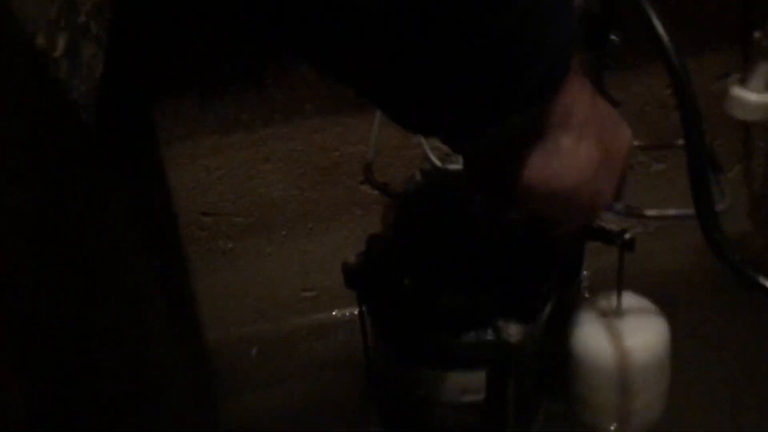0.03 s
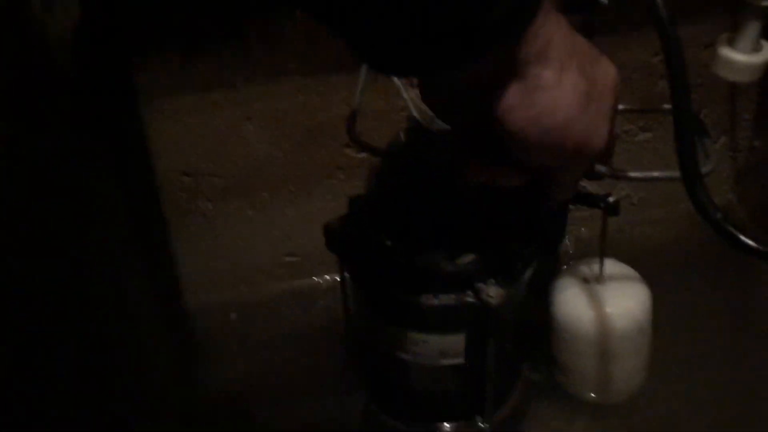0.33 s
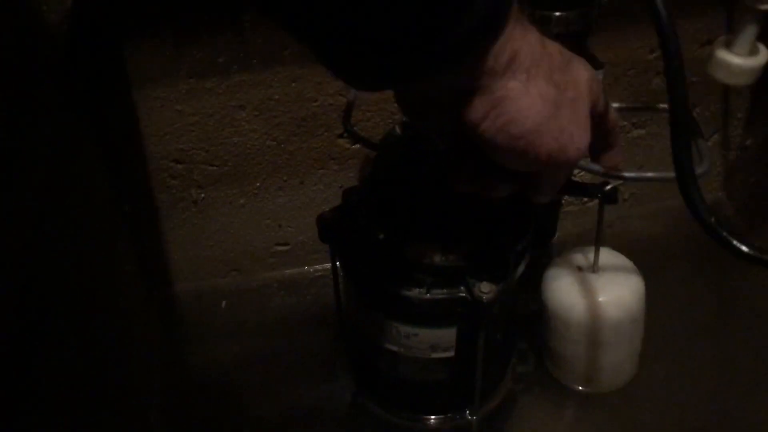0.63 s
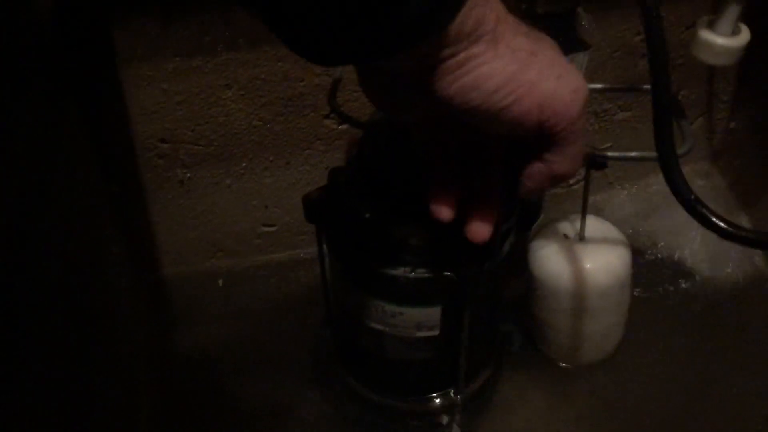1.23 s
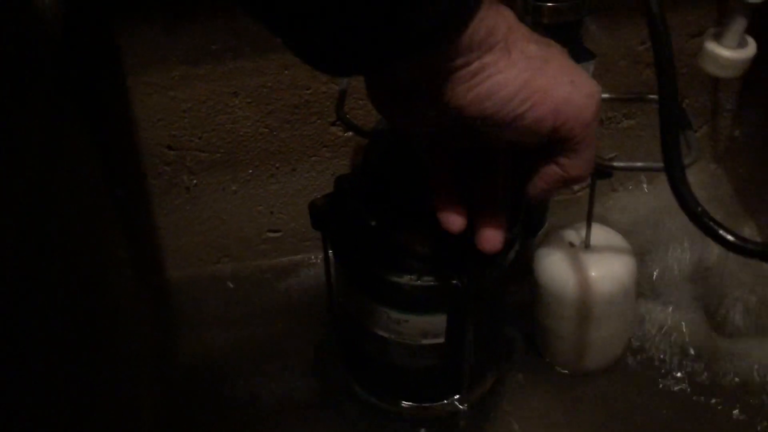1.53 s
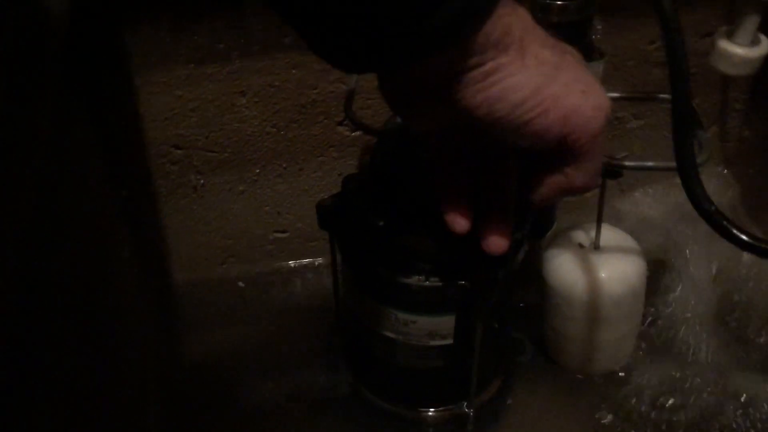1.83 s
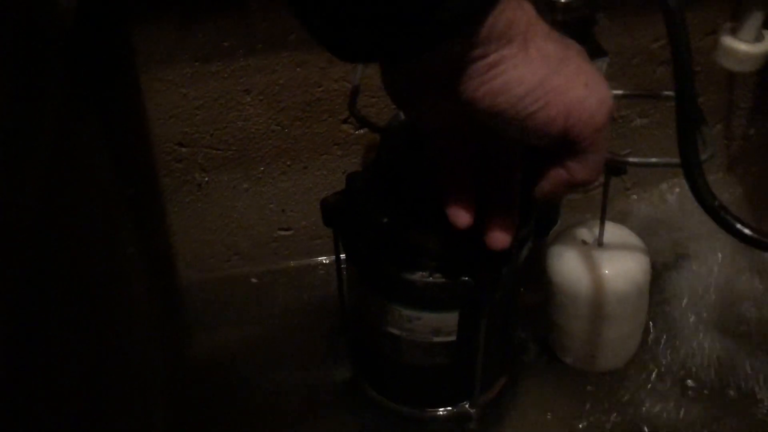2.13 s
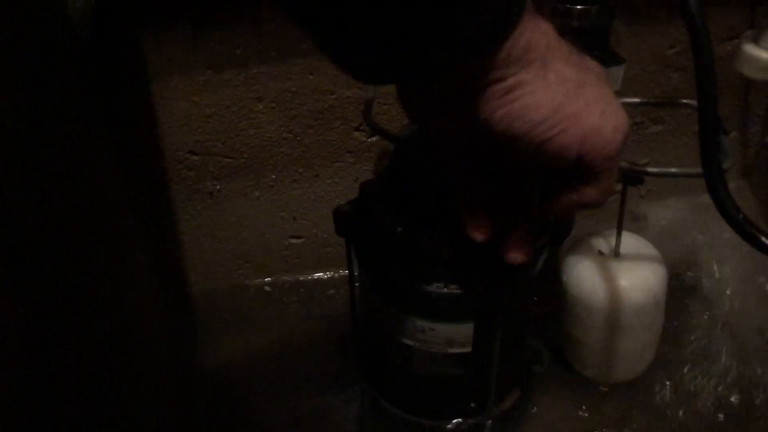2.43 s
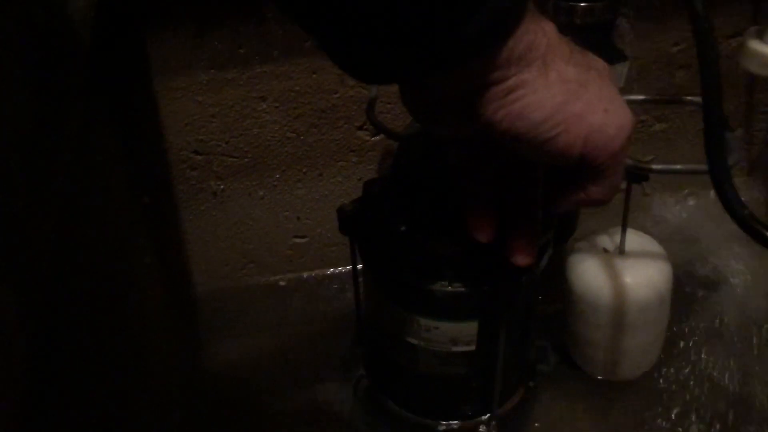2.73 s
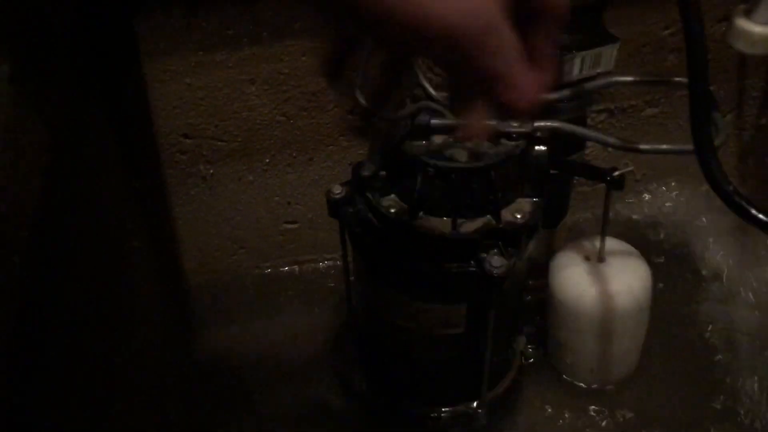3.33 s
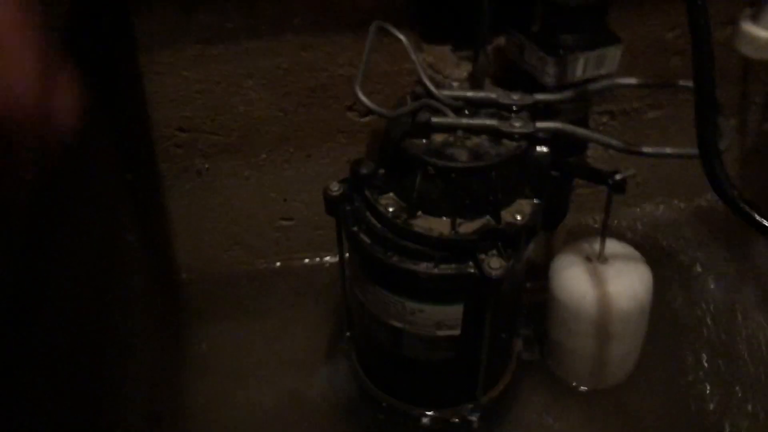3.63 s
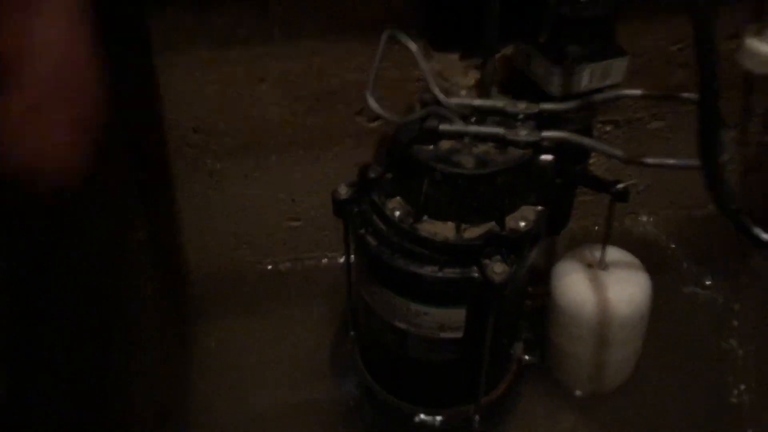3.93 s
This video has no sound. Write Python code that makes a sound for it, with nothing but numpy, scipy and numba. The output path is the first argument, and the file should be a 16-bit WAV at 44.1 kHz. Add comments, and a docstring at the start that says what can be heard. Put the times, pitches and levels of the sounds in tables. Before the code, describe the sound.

A sump pump sprays water in a concrete pit, heard from just above. A switch clacks, air spits out, then a hissing jet churns the water. The spray dies away and water gurgles and drips back.

```python
"""Sump pump in a concrete pit.

Heard from just above. The float rod ticks, the switch clacks on and the submerged motor kicks.
The pump spits out air, then a jet sprays (droplet impacts) and churns the water (ringing bubbles).
When it stops, the jet dies away and water gurgles back down the pipe into the pit."""
import sys
import numpy as np
from scipy import signal
from scipy.fft import rfft, irfft
from scipy.io import wavfile
from scipy.ndimage import uniform_filter1d
from numba import njit

SR = 44100
rng = np.random.default_rng(int(sys.argv[2]) if len(sys.argv) > 2 else 0)


def waveform_to_disk(signal):
    """Save audio, clipped to [-1, 1], as 16-bit WAV at the path in sys.argv[1]."""
    frames = np.transpose(np.atleast_2d(signal))
    scaled = np.clip(frames, -1, 1) * 32767
    samples = np.round(scaled).astype(np.int16)
    wavfile.write(sys.argv[1], SR, samples)


N = 176400

# Pit resonances and hollows. Each row: centre in Hz, width in Hz, boost in dB.
PIT_MODES = [(95, 35, 8.5), (121.3, 22.2, -16), (153, 39, 7.5), (292, 40, -4.5), (363, 30, 5.5),
             (460.3, 41, 9.5), (493, 21, -10), (554, 20, 4), (866, 95, 4.5), (956, 42, -21.5),
             (1014, 26, 8), (1150, 31, 10), (1355, 23, 5.5), (1455, 32, 9), (1807, 43, 12)]
# Splash spectrum. Each row: frequency in Hz, gain in dB.
SPLASH_SPECTRUM = [(800, -9.5), (2500, 0.5), (3800, -3.5), (5000, 1), (5900, -0.5), (7300, 2.5), (8800, -1),
                   (11300, 0.5), (13500, -6), (16000, -10)]
BUBBLE_CYCLES, BUBBLE_RISE = 8, 0.076  # mean cycles to die away; fractional pitch rise meanwhile


def undb(db):
    """Decibels to gain."""
    return 10 ** (np.asarray(db) / 20)


def unit(x):
    """Scale to rms 1."""
    return x / np.sqrt(np.mean(x ** 2))


def noise():
    """White noise."""
    return rng.standard_normal(N)


def curve(rows):
    """Gain along (s, dB) points, silent before the first."""
    return undb(np.interp(np.arange(N) / SR, *np.array(rows).T, left=-120))


def flutter(rate_hz, depth_db):
    """Smooth random gain; depth is rms."""
    width = int(SR / rate_hz)
    return undb(depth_db * unit(uniform_filter1d(uniform_filter1d(noise(), width), width)))


def burst(start_s, db, attack_s, t60_s):
    """Envelope: linear rise, exponential decay."""
    age_s = np.arange(N) / SR - start_s
    decay = np.exp(-np.log(1000) * np.maximum(age_s - attack_s, 0) / t60_s)
    return undb(db) * np.clip(age_s / attack_s, 0, 1) * decay


def highpass(x, hz):
    """Second-order low cut."""
    return signal.sosfilt(signal.butter(2, hz, "high", fs=SR, output="sos"), x)


def colour(x, spectrum, modes=()):
    """Filter by (Hz, dB) points plus (Hz, width Hz, dB) resonances; output rms 1."""
    size = 16384
    bin_hz = np.arange(size // 2 + 1) * SR / size
    hz, db = np.array(spectrum).T
    shape_db = np.interp(np.log(bin_hz + 1), np.log(hz), db)
    for centre_hz, width_hz, boost_db in modes:
        shape_db += boost_db / (1 + (2 * (bin_hz - centre_hz) / width_hz) ** 2)
    cepstrum = irfft(np.log(undb(shape_db)))
    cepstrum[1:size // 2] *= 2  # fold to minimum phase
    cepstrum[size // 2 + 1:] = 0
    impulse = irfft(np.exp(rfft(cepstrum)))[:size // 2]
    return unit(signal.fftconvolve(x, impulse)[:N])


@njit
def ring(rows, rise):
    """Bubbles ring as fading sines that rise in pitch."""
    out = np.zeros(N)
    for start_s, hz, gain, t60_s in rows:
        first, phase = int(start_s * SR), 0.
        for i in range(min(int(t60_s * SR), N - first)):
            age = i / (t60_s * SR)
            phase += 2 * np.pi * hz * (1 + rise * age) / SR
            out[first + i] += gain * np.exp(-6.9 * age) * (1 - np.exp(-phase / 2)) * np.sin(phase)
    return out


def bubbles(per_s, low_hz, high_hz, spread_db):
    """Cloud of random bubbles; high ones are shorter and sharper."""
    when, pitch, weakness, life = rng.random((int(per_s * N / SR), 4)).T
    hz = low_hz * (high_hz / low_hz) ** pitch
    gain = hz * undb(-spread_db * np.sqrt(weakness))
    t60_s = BUBBLE_CYCLES * (.5 + life) / hz
    return unit(ring(np.column_stack([when * N / SR, hz, gain, t60_s]), BUBBLE_RISE))


def drops(per_s, spread_db):
    """Random droplet impacts of uneven strength."""
    impacts = (rng.random(N) < per_s / SR) * np.sign(noise())
    return impacts * undb(spread_db * np.clip(noise(), -1.5, 1.5))


def jet():
    """Air pops and spits out, mist swells until the air is gone, spray runs on and ends in loose drops."""
    # Spectra. Each row: frequency in Hz, gain in dB.
    pop_spectrum = [(40, -17), (100, -3), (300, -11), (700, 6), (1700, 0), (2600, -6.5), (6000, -35),
                    (16000, -23)]
    spit_spectrum = [(1000, -25), (2800, -25), (4000, -1.5), (6000, 2.5), (9500, 9), (12500, 2),
                     (16000, -6)]
    mist_spectrum = [(2500, -31), (4500, 0), (7500, -8), (11800, 4.5), (16000, -9)]
    spray_spectrum = [(500, -14.5), (1800, -8.5), (2500, -8), (4000, -7), (5700, 1.5), (7800, 0.5),
                      (8900, -3), (12000, -3.5), (13500, -8.5), (16000, -12.5)]
    # Resonances. Each row: centre in Hz, width in Hz, boost in dB.
    pop_modes = [(882, 73, 9), (1660, 80, 6)]
    spray_modes = [(1770, 160, 4), (1940, 200, -4), (2485, 215, 11), (2760, 200, 7), (3426, 220, 8.5),
                   (7270, 340, 3.5)]
    # Hiss as the pump runs up and down. Each row: time in seconds, level in dB.
    spray_levels = [(.68, -75), (.735, -63), (.775, -37), (.83, -27), (.86, -33), (.93, -26), (1.02, -22.5),
                    (1.07, -24), (2.0, -25), (2.9, -23.5), (3.19, -24), (3.28, -32), (3.36, -42),
                    (3.5, -84)]
    pop = colour(noise(), pop_spectrum, PIT_MODES + pop_modes)
    pop *= burst(start_s=.8075, db=-15.5, attack_s=.0073, t60_s=.082)
    spit = colour(noise(), spit_spectrum) * burst(start_s=.807, db=-13, attack_s=.013, t60_s=.047)
    mist = colour(noise(), mist_spectrum) * burst(start_s=.855, db=-22.5, attack_s=.17, t60_s=.063)
    spray = colour(drops(per_s=9000, spread_db=2.8), spray_spectrum, spray_modes)
    last_drops = colour(bubbles(per_s=1200, low_hz=1010, high_hz=12100, spread_db=25), SPLASH_SPECTRUM)
    last_drops *= burst(start_s=3.195, db=-32, attack_s=.051, t60_s=.52)
    spray *= curve(spray_levels) * flutter(rate_hz=78, depth_db=1.1)
    return pop + spit + mist + spray + last_drops


def churn():
    """The jet splashes and drives air under water; splashes and bubbles sound the pit."""
    # Stirred water. Each row: time in seconds, level in dB.
    levels = [(.68, -59), (.705, -50), (.75, -45.5), (.79, -29), (.83, -40), (.865, -43.5), (.93, -30),
              (1.2, -30.5), (1.9, -30), (2.6, -31), (3.2, -32), (3.26, -35.5), (3.34, -44), (3.5, -40.5)]
    # Its spectrum. Each row: frequency in Hz, gain in dB.
    spectrum = [(30, -59), (65, -23.5), (105, 1.5), (150, 7), (280, 5), (500, 5.5), (820, 2), (1250, -3.5),
                (2000, -4.5), (3500, -16.5)]
    cloud = colour(bubbles(per_s=2500, low_hz=69.9, high_hz=2724, spread_db=8.5), spectrum, PIT_MODES)
    splash = colour(drops(per_s=2500, spread_db=2.5), spectrum, PIT_MODES)
    return unit(cloud + undb(-4.5) * splash) * curve(levels) * flutter(rate_hz=23, depth_db=.7)


def backflow():
    """The pipe drains in gurgles and dull slaps, with light patter and drips."""
    # Returning water. Each row: time in seconds, level in dB.
    levels = [(3.33, -73), (3.38, -39), (3.42, -30.5), (3.47, -29.5), (3.53, -28), (3.7, -28), (3.86, -31),
              (3.92, -29), (4, -33.5)]
    # Gurgle and slap spectrum. Each row: frequency in Hz, gain in dB.
    spectrum = [(30, -44), (80, 0), (200, 2), (400, 4.5), (900, 0), (1350, -4.5), (1800, -10.5),
                (2400, -13.5), (4000, -19), (9000, -24)]
    # Patter resonances. Each row: centre in Hz, width in Hz, boost in dB.
    patter_modes = [(2720, 140, 3.5), (3230, 130, 7.1), (5800, 300, 6)]
    gurgle = colour(bubbles(per_s=1500, low_hz=71.3, high_hz=2460, spread_db=15), spectrum, PIT_MODES)
    slaps = colour(drops(per_s=600, spread_db=6.5), spectrum, PIT_MODES)
    patter = colour(drops(per_s=1700, spread_db=1), SPLASH_SPECTRUM, patter_modes)
    water = unit(gurgle + undb(.5) * slaps) + undb(-7) * patter + undb(-14.5) * drips()
    return water * curve(levels) * flutter(rate_hz=69, depth_db=1.2)


def glugs_and_splashes():
    """Single bubbles, sharp splashes and wet splats stand out of the rush."""
    # Deep glugs to bright plinks. Each row: start in seconds, pitch in Hz, level in dB, t60 in seconds.
    glugs = [(0.7353, 407, -20.5, 0.02), (0.821, 99, -28.5, .16), (.899, 360, -12.5, 0.062),
             (0.934, 186, -22, 0.069), (1.224, 161, -18.5, 0.12), (1.395, 465, -20, 0.12),
             (1.429, 170, -20.5, .08), (1.521, 185, -22, 0.065), (1.6337, 2690, -17, 0.026),
             (1.637, 2400, -14.5, 0.029), (1.761, 159, -17, 0.11), (2.062, 2550, -18, .04),
             (2.128, 450, -19.5, 0.14), (2.159, 181, -17, 0.065), (2.751, 2590, -15, .028),
             (2.794, 510, -16.5, 0.033), (3.395, 230, -21, 0.13), (3.437, 460, -9.5, 0.014),
             (3.493, 527, -18.5, 0.014), (3.767, 455, -11, 0.021), (3.785, 1340, -21.5, 0.11),
             (3.786, 1783, -18, 0.072), (3.836, 624, -16.5, 0.023), (3.954, 460, -22, 0.088)]
    # Each row: start in seconds, level in dB.
    splashes = [(1.778, -18.5), (3.429, -22), (3.493, -26), (3.765, -23.5)]
    # Each row: start in seconds, centre in Hz, level in dB, t60 in seconds.
    splats = [(.7335, 760, -38, .035), (.898, 850, -22, 0.061), (.932, 620, -27, .1),
              (.954, 1310, -31.5, 0.14), (1.92, 440, -29.5, 0.32), (2.233, 1500, -27.5, 0.043),
              (2.881, 9400, -17, 0.033), (3.188, 1120, -24.5, 0.062), (3.392, 8300, -25.5, 0.02),
              (3.405, 1080, -23, 0.022), (3.428, 1190, -22.5, 0.055), (3.713, 800, -26, 0.018),
              (3.732, 6200, -24.5, .025), (3.918, 1320, -27.5, 0.087)]
    water = colour(noise(), SPLASH_SPECTRUM)
    water *= sum(burst(start_s, db, attack_s=.0018, t60_s=.039) for start_s, db in splashes)
    for start_s, hz, db, t60_s in glugs:
        glug = ring(np.array([(start_s, hz, undb(db), t60_s)]), BUBBLE_RISE)
        water += highpass(glug, .61 * hz)
    return water + sum(splat(*row) for row in splats)


def splat(start_s, hz, db, t60_s):
    """Brief cluster of like-sized bubbles, as a band of noise."""
    edges_hz = hz * np.exp([-.25, .25])
    band = signal.sosfilt(signal.butter(2, edges_hz, "band", fs=SR, output="sos"), noise())
    return unit(band) * burst(start_s, db, attack_s=.0016, t60_s=t60_s)


def drips(per_s=350, t60_s=.03):
    """Tiny bubbles tinkle where single drops land."""
    when, pitch, weakness = rng.random((int(per_s * N / SR), 3)).T
    hz = 3200 + 8800 * pitch
    rows = np.column_stack([when * N / SR, hz, undb(-14 * weakness), np.full(len(when), t60_s)])
    return unit(ring(rows, rise=.02))


def float_switch(tick_s=.191, tick_hz=4800, snap_s=.6795):
    """The rod ticks and scrapes, then the switch snaps over."""
    # Rod knock and scrape. Each row: start in seconds, level in dB, attack in seconds, t60 in seconds.
    rod_contacts = [(.592, -50.5, 0.0022, 0.095), (.637, -53.5, 0.014, 0.76)]
    # Spectra. Each row: frequency in Hz, gain in dB.
    rod_spectrum = [(180, -35), (330, -11), (1850, -1), (2800, -4), (9800, -19), (15000, -36)]
    switch_spectrum = [(59, -43), (100, -24), (1000, -13.5), (1160, -5), (1430, -11), (2000, -9),
                       (3180, -16), (6350, -6), (7510, -13.5), (15000, -13)]
    # Switch resonances. Each row: centre in Hz, width in Hz, boost in dB.
    switch_modes = [(2020, 70, 6.3), (2850, 83, 7.8), (6430, 490, 8.9)]
    tick = colour(noise(), [(1000, -70), (tick_hz, -25), (8000, -45)], [(tick_hz, 500, 22)])
    tick *= burst(tick_s, db=-48.5, attack_s=.002, t60_s=.058)
    crack = colour(noise(), [(1500, -26), (5000, 7), (14000, -17)])
    crack *= burst(tick_s, db=-52.5, attack_s=.00087, t60_s=.04)
    rod = colour(noise(), rod_spectrum) * sum(burst(*row) for row in rod_contacts)
    snap = burst(snap_s, db=-22, attack_s=.004, t60_s=.052)
    tail = burst(snap_s, db=-48, attack_s=.0044, t60_s=.15)
    return tick + crack + rod + colour(noise(), switch_spectrum, switch_modes) * (snap + tail)


def motor_start(start_s=.697, hum_hz=118):
    """The housing jolts and hums briefly as the rotor gets going."""
    hum = np.sin(2 * np.pi * hum_hz * np.arange(N) / SR)
    hum *= burst(start_s, db=-43.5, attack_s=.011, t60_s=.2)
    jolt = colour(noise(), [(60, -20), (400, -5), (2000, -28)], PIT_MODES)
    jolt *= burst(start_s, db=-39.5, attack_s=.0032, t60_s=.09)
    return hum + jolt


def walls(x, wet_db=-14):
    """Add dense, short treble reflections from the pit walls."""
    echoes = highpass(noise() * burst(start_s=.00097, db=0, attack_s=.0034, t60_s=.074), hz=2040)
    return x + undb(wet_db) * signal.fftconvolve(x, echoes / np.linalg.norm(echoes))[:N]


def cellar(level_db=-66):
    """Faint, steady, bass-heavy room noise."""
    # Each row: frequency in Hz, gain in dB.
    spectrum = [(25, -18), (75, -1), (220, -10.5), (537, -17), (2230, -26.5), (7700, -28.5), (15500, -33)]
    return undb(level_db) * colour(noise(), spectrum)


def scene():
    """Pump and water in the pit, over the quiet cellar; both channels alike."""
    pit = float_switch() + motor_start() + jet() + churn() + backflow() + glugs_and_splashes()
    mono = walls(pit) + cellar()
    return np.array([mono, mono])


def record(dry):
    """Cut the deep bass and the top."""
    low_hz, top_hz = 50, 15800
    return signal.sosfilt(signal.ellip(10, .2, 70, top_hz, fs=SR, output="sos"), highpass(dry, low_hz))


dry = scene()
out = record(dry)
waveform_to_disk(out)
```